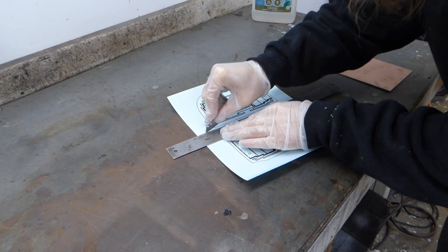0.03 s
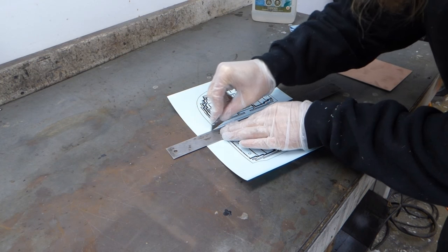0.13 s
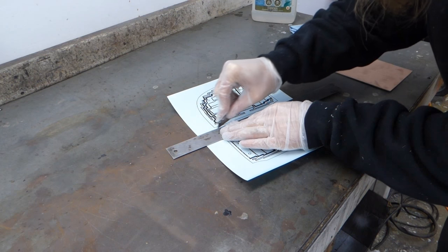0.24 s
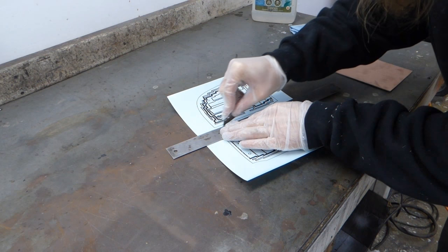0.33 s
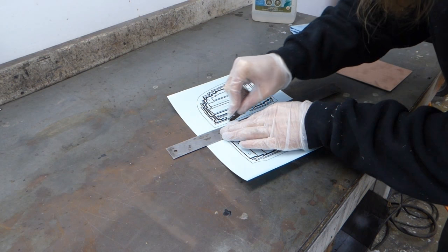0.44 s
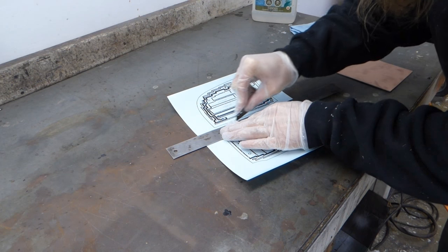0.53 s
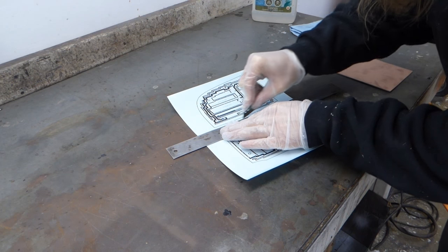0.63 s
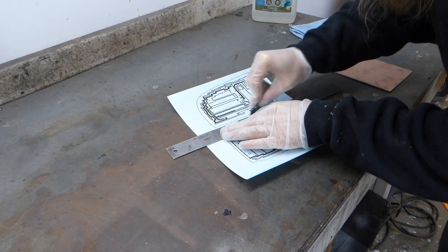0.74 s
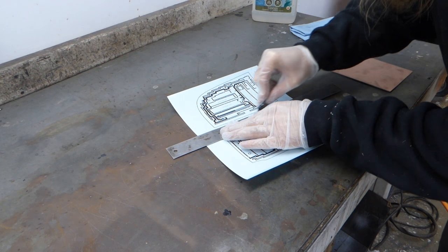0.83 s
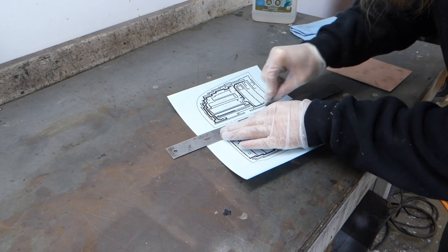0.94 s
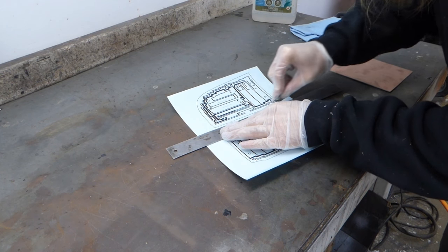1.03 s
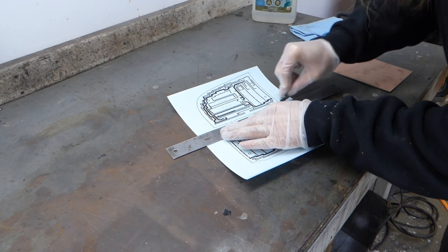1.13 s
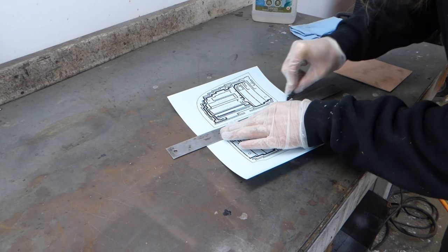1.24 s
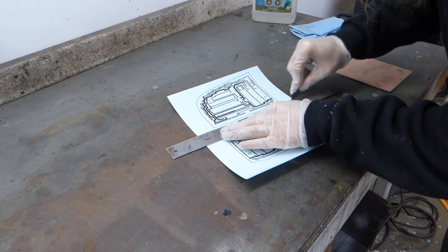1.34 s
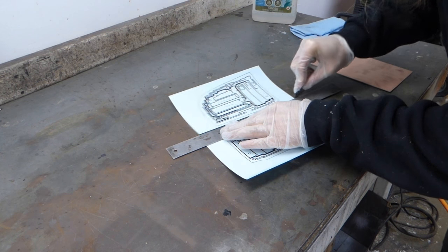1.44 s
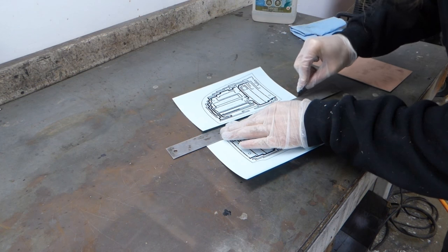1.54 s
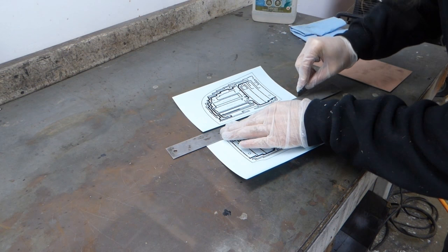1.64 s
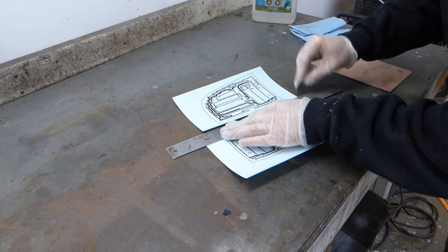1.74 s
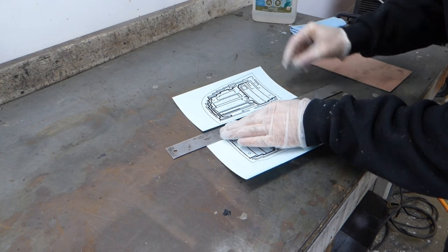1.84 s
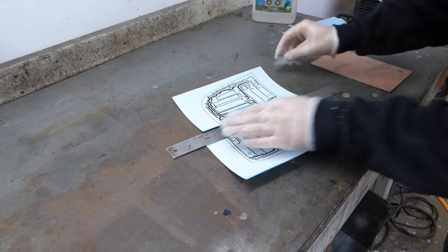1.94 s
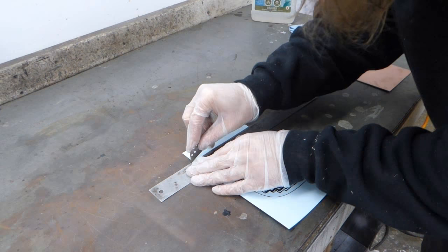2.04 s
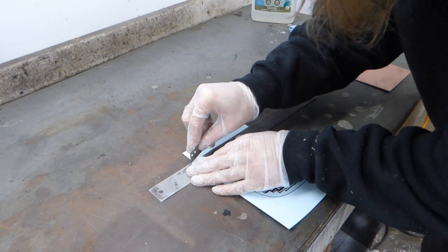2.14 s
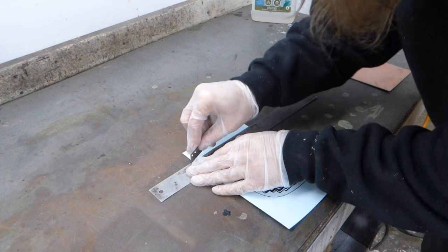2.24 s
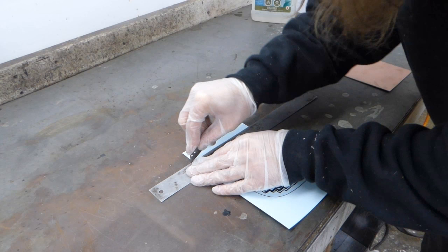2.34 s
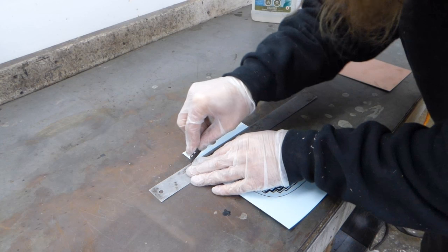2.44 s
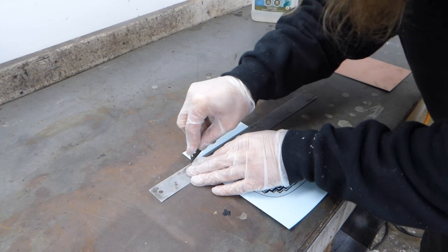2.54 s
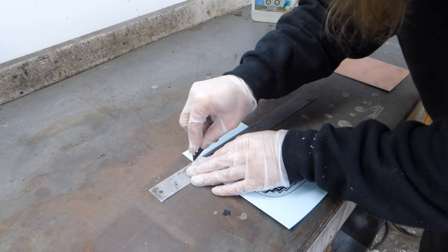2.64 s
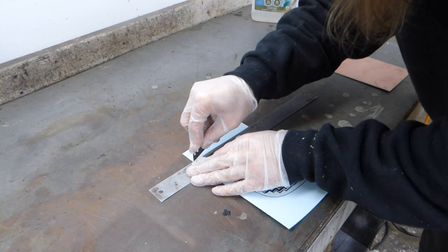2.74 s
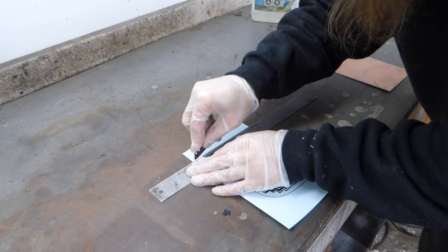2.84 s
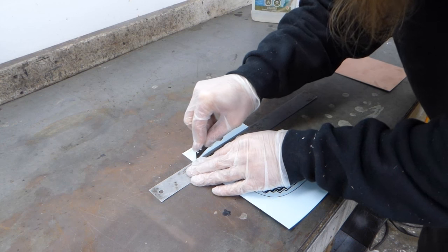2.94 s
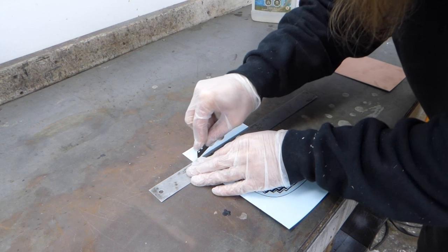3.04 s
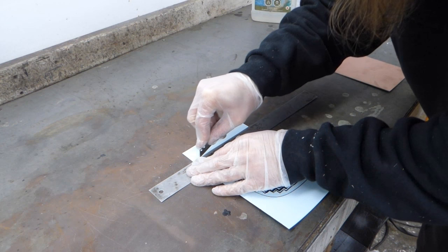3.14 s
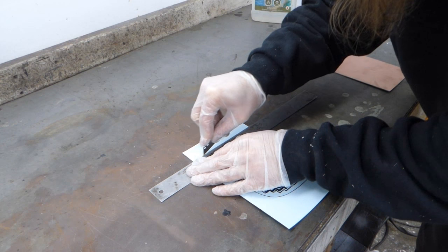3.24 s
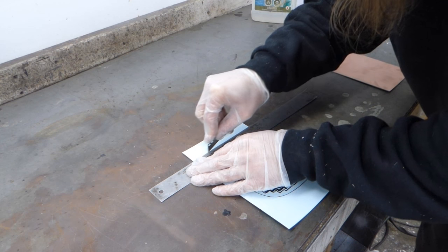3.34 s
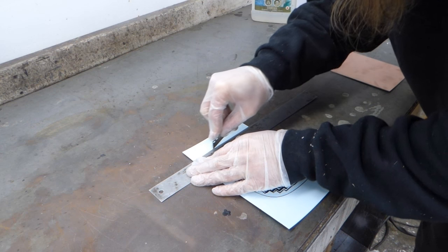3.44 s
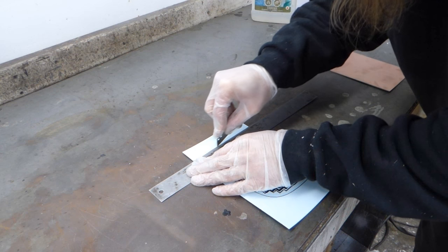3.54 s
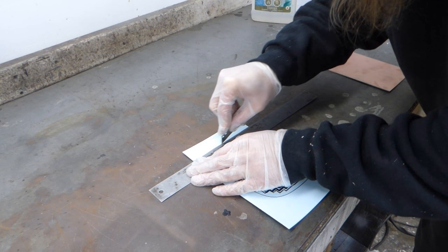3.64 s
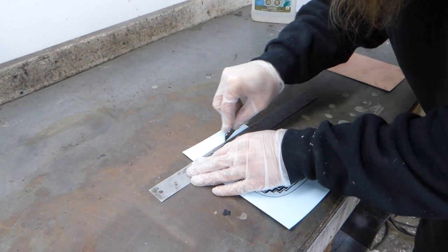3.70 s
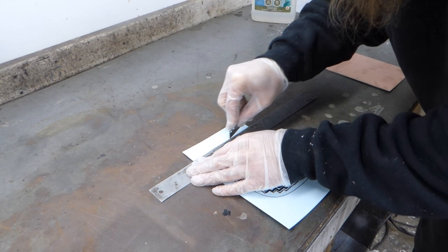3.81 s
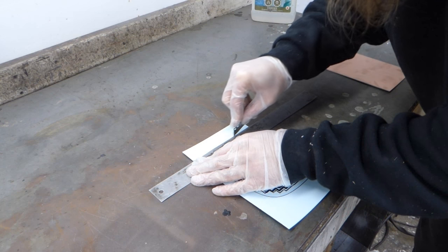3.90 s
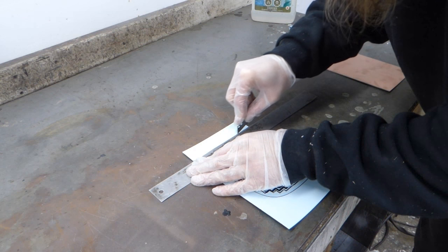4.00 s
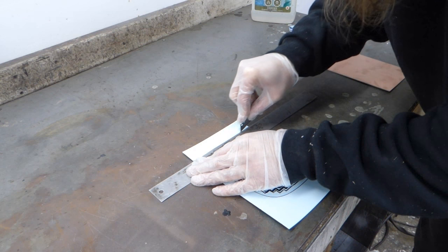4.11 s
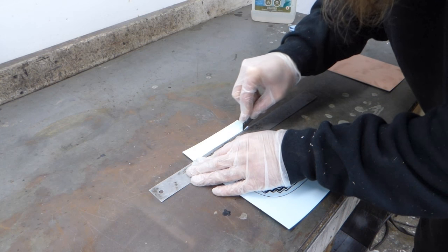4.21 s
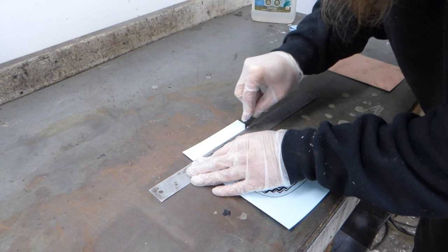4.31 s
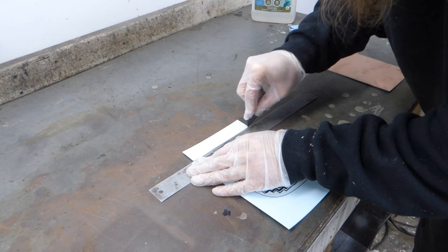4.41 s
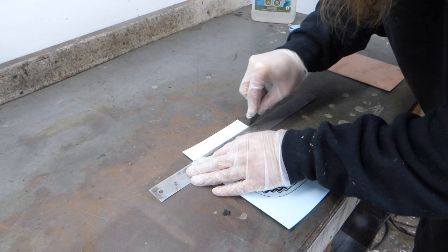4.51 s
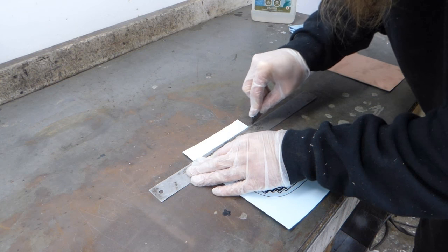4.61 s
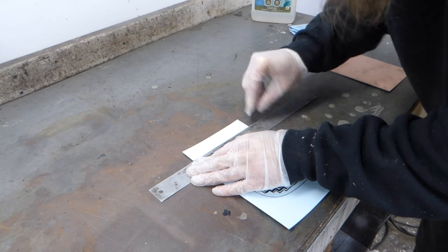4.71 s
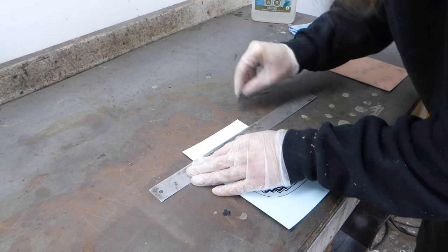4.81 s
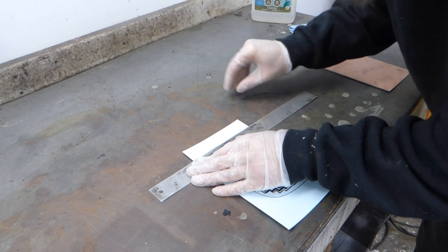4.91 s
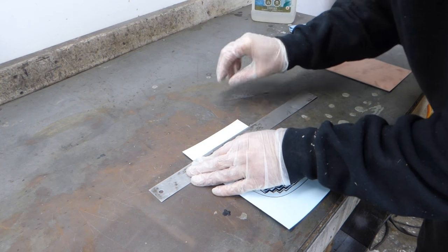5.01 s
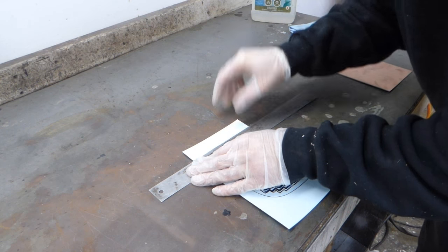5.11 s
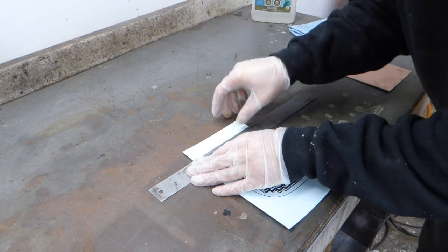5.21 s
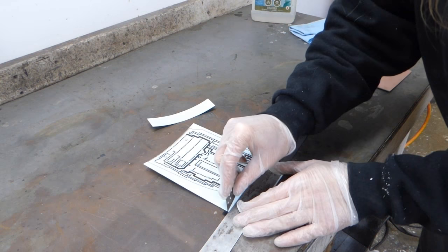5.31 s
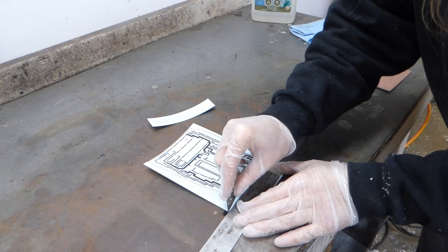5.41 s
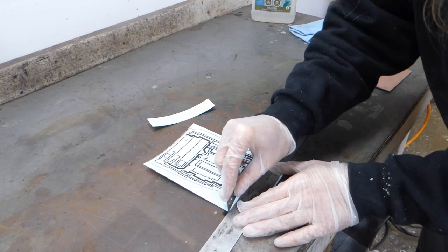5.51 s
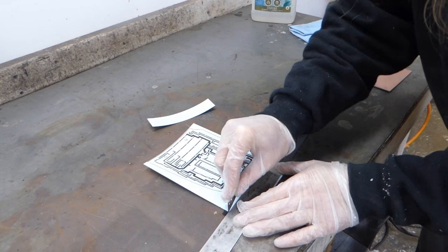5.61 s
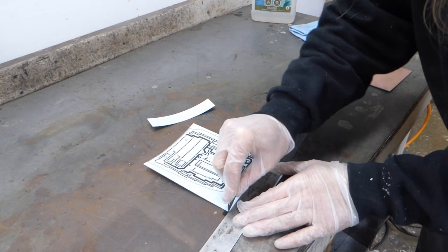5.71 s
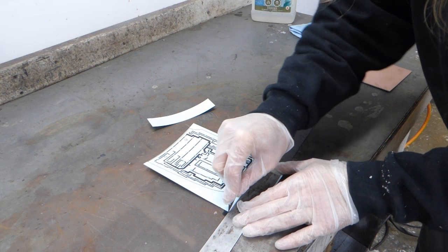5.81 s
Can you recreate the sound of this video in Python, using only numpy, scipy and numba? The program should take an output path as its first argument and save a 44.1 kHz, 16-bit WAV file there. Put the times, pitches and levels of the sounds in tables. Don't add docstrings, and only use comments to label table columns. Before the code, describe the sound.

Close, dry stereo sound in a small, moderately reverberant workshop with faint room tone and microphone hiss. From 0 to about 1.45 s a blade drags along a steel ruler through paper: uneven gritty scraping, low sheet-metal rumble, papery tearing and bright hiss, with a flap tone sinking in pitch and a tick at 0.6 s. A short rub follows at 1.5 s, then light ticks and scuffs around 1.75 and 1.95 s, and a cluster of clicks with a high steel squeal at 2.06 s. Small rubs occur at 2.4 to 2.9 s. The second cut begins softly at 3.0 s, strengthens from 3.4 s and lasts until 4.5 s, in two pushes. Brief scuffs follow at 4.5 to 4.8 s. At 4.92 s a very sharp, bright metal clack bounces rapidly and rings briefly. A low short rub comes at 5.2 s; the ambience cuts at 5.28 s, leaving quiet hiss and two barely audible ticks.

```python
import sys
import numpy as np
from scipy import signal
from scipy.fft import rfft, irfft, next_fast_len
from scipy.io import wavfile
from scipy.ndimage import uniform_filter1d
from numba import njit

SR = 44100
rng = np.random.default_rng(int(sys.argv[2]) if len(sys.argv) > 2 else 0)


def ratio_of_db(decibels):
    return 10 ** (np.asarray(decibels, float) / 20)


def file_out(sig):
    cols = np.atleast_2d(sig).T
    lim = np.clip(cols, -1, 1)
    pcm = np.round(lim * 32767).astype(np.int16)
    wavfile.write(sys.argv[1], SR, pcm)


N = 258205
T = np.arange(N) / SR
SCENE_CHANGE_S = 5.277


def unit(x):
    return x / np.sqrt(np.mean(x ** 2))


def on_log(hz, table, column=1):
    table = np.array(table, float)
    return np.interp(np.log(hz + 1), np.log(table[:, 0]), table[:, column])


def along(table, column):
    columns = np.transpose(table)
    return np.interp(T, columns[0], columns[column])


def colour(x, spectrum):
    size = 2048
    hz = np.arange(size // 2 + 1) * SR / size
    cepstrum = irfft(np.log(ratio_of_db(on_log(hz, spectrum))))
    cepstrum[1:size // 2] *= 2
    cepstrum[size // 2 + 1:] = 0
    response = irfft(np.exp(rfft(cepstrum)))
    return signal.fftconvolve(x, response)[:len(x)]


@njit
def moving_band(x, hz, width):
    y, band_state, low_state = np.empty(len(x)), 0., 0.
    for i in range(len(x)):
        g, k = np.tan(np.pi * hz[i] / SR), width / hz[i]
        v = (band_state + g * (x[i] - low_state)) / (1 + g * (g + k))
        band_state = 2 * v - band_state
        low_state += 2 * g * v
        y[i] = k * v
    return y


def band(x, hz, width):
    return moving_band(x, hz + np.zeros(len(x)), float(width))


def passband(x, low_hz, high_hz):
    return signal.sosfilt(signal.butter(3, [low_hz, high_hz], "band", fs=SR, output="sos"), x)


def body(x, modes):
    return unit(sum((-1) ** k * ratio_of_db(db) * band(x, hz, width) for k, (hz, width, db) in enumerate(modes)))


def walk(rate):
    hold = int(SR / rate)
    steps = np.repeat(rng.standard_normal(N // hold + 1), hold)
    return 1.1 * uniform_filter1d(uniform_filter1d(steps, hold), hold)[:N]


def swell(start, ms, skew):
    progress = np.clip((T - start) * 1000 / ms, 0, 1)
    return np.sqrt(np.sin(np.pi * progress ** skew).clip(0))


def pan(x, left_minus_right_db):
    return x * ratio_of_db(np.array([[left_minus_right_db], [-left_minus_right_db]]) / 2)


def grit(scatter_db, flicker_db, rate):
    size = np.minimum(rng.exponential(size=N), 4.5)
    return rng.standard_normal(N) * ratio_of_db(scatter_db * size + flicker_db * walk(rate))


# time_s, pressure_db on the bench, sliding_speed_db
CUTS = [
    [(0.0, -45, -55), (0.226, -38, -44), (0.394, -42, -49), (0.596, -36, -43), (0.646, -39, -46),
     (1.218, -39, -43), (1.432, -43, -50), (1.45, -46, -51)],
    [(3.0, -49, -68), (3.03, -48, -59), (3.06, -47, -62), (3.134, -41, -56), (3.14, -43, -49),
     (3.176, -40, -55), (3.434, -38, -45), (3.53, -37, -50)],
    [(3.545, -42, -50), (3.761, -37, -47), (3.907, -40, -49), (3.961, -36, -46), (4.179, -36, -52),
     (4.219, -41, -56), (4.293, -38, -53), (4.515, -46, -57)],
]
# start_s, hold_ms, pressure_db, speed_db, rise_db_per_ms
RUBS = [(1.465, 85, -42.5, -49, .9), (1.6, 40, -52.5, -64, .9), (4.0, 40, -34, -49, .4),
        (1.775, 40, -56, -60, .9), (1.9, 35, -58, -57, .1), (1.95, 30, -52, -56, .9),
        (2.51, 30, -62, -68, .4), (2.601, 108, -38.5, -57.5, 12), (2.74, 50, -53, -72, .9),
        (2.845, 35, -43, -59, .25), (2.892, 80, -43, -56, 3), (4.278, 12, -38, -51, 5),
        (4.525, 40, -37.5, -58, 1.5), (4.565, 50, -36, -57, .2), (4.68, 30, -48, -68, .9),
        (4.741, 30, -46, -56, 4), (4.8, 50, -58, -61, .2), (0.0, 20, -43, -55, .9),
        (5.198, 62, -41, -63, 12)]


def hand():
    controls = np.full((2, N), -120.)
    moves = [(cut, .9) for cut in CUTS]
    for s, ms, pressure_db, speed_db, rise in RUBS:
        moves.append(([(s, pressure_db, speed_db), (s + ms / 1000, pressure_db, speed_db)], rise))
    for move, rise in moves:
        s, *columns = np.transpose(move)
        early, late = (s[0] - T).clip(0), (T - s[-1]).clip(0)
        for k, fall_db_s in enumerate([200, 290]):
            level = np.interp(T, s, columns[k]) - 1000 * rise * early - fall_db_s * late
            controls[k] = np.maximum(controls[k], level)
    return controls


# time_s, bench_tilt_db_per_octave, rasp_db, deepest_modes_db
BITE = [(0.0, 0, 0, 0), (0.5, 0.1, -1, -1), (0.8, 0.5, 1, 0.1), (1.1, 0.6, 2, 0.5), (1.5, 0.6, 1, 1),
        (2.5, 0.1, 0.1, 0.1), (2.75, -1, 1, 2), (3.1, -1, 0.1, 3), (3.3, -0.5, 0.1, 2), (3.47, 2.5, 4, 2),
        (3.6, 1, 0.1, 2), (3.8, 1.5, 3, 0.1), (4.0, 0.1, 0.1, 1), (4.25, -2, 0.1, -1), (4.6, -1, 2, -3),
        (5.19, -2, 1, -2), (5.23, -6, 1, -5)]
# centre_hz, width_hz, level_db
RASP = [(1024, 370, -2), (1307, 90, 4), (1603, 355, -5)]
# pitch_hz, level_db_per_hz
PAPER = [(880, -13), (1500, -5), (1740, -10.5), (1970, 2), (2580, -1), (3350, 1.5), (5500, -6.5),
         (7150, -17), (12100, -120)]
# pitch_hz, level_db_per_hz
HISS = [(2650, -25.5), (4500, -7.5), (5140, -6), (6150, 3), (7060, 4.5), (8030, 0), (9550, 3), (13000, -14),
        (14600, -19.5), (15300, -24)]


def cutting():
    pressure_db, speed_db = hand()
    coarse, fine = grit(2.4, 1.4, rate=45), grit(2.5, 1.9, rate=35)
    loose, edge = grit(2.4, 1.5, rate=30), grit(2.2, 1.8, rate=20)
    rumble = unit(passband(passband(bench(coarse), 95, 1040), 60, 1100))
    rasp = unit(passband(body(coarse, RASP), 946, 2000))
    blade = unit(unit(colour(fine, HISS)) + 0.24 * singing_edge(edge))
    rasp_db = .65 * speed_db + .35 * pressure_db - 7.3 + along(BITE, 2)
    paper_db = .68 * speed_db + .32 * pressure_db - 7.2
    paper = unit(colour(fine, PAPER)) * ratio_of_db(paper_db) + paper_flap(loose, edge) * ratio_of_db(speed_db)
    low = pan(rumble, .2) * ratio_of_db(pressure_db - 0.6) + pan(rasp, 0.95) * ratio_of_db(rasp_db)
    return low + pan(paper, 1.49) + pan(blade, 2.4) * ratio_of_db(speed_db - 0.1)


# centre_hz, width_hz, level_db
BENCH = [(140.5, 33, -13.5), (172, 26, -4.5), (209.4, 13, -3), (255.7, 25.4, -2), (303.6, 22.4, 1),
         (366.3, 23, -4.5), (412, 14, 3.5), (489.4, 36, -4.5), (569, 20, -1.5), (620, 34, -6.5),
         (694, 34, -2.5), (790, 75, -8.5), (881, 55, -7), (985, 70, -9)]
# time_s, modes_near_280_hz_db, mode_near_690_hz_db
NODES = [(0.0, -5, -4), (0.2, -1, -3), (0.45, -3, 1), (0.6, -4, 2), (0.72, 2, -1), (0.85, 2, -5),
         (1.05, 5, -5), (1.5, -2, -4), (2.6, -4, -1), (3.0, -3, -3), (3.3, -3, -4), (3.6, 0.1, -1),
         (4.05, 1, 2), (4.25, 0.1, -4), (4.6, -1, -2), (5.2, 0.1, -3)]


def bench(slips):
    tilt, deep = along(BITE, 1), along(BITE, 3)
    pair, upper = along(NODES, 1), along(NODES, 2)
    out = 0
    for k, (hz, width, db) in enumerate(BENCH):
        place_db = tilt * np.log2(hz / 400) + deep * (hz < 230)
        place_db = place_db + pair * (230 < hz < 330) + upper * (650 < hz < 750)
        patchy_db = 1.4 * walk(6)
        out = out + (-1) ** k * ratio_of_db(db + patchy_db + place_db) * band(slips, hz, width)
    return unit(out)


# centre_hz, width_hz, level_db
RULER = [(1960, 60, -3), (2140, 60, -4), (2357, 50, 1.5), (2557, 50, -2), (2627, 45, 1.5), (2760, 60, -2),
         (3020, 50, -2), (3106, 40, -3), (3273, 50, 2), (3510, 55, 1.5), (3688, 45, -2), (3900, 50, -1),
         (4183, 50, -2), (4400, 60, -2)]


def paper_flap(loose, edge):
    low_hz = (2900 - 500 * T ** 1.3).clip(1500) * (1 + 0.016 * walk(25.15))
    high_hz = low_hz * 1.56
    lower = unit(moving_band(moving_band(loose, low_hz, 520.), low_hz, 520.))
    upper = unit(moving_band(moving_band(edge, high_hz, 1600.), high_hz, 1600.))
    lower_db = 4.8 - 12 * (1 - T / .72).clip(0) - 11 * (T - 1.03).clip(0)
    flap = lower * ratio_of_db(lower_db) + upper * ratio_of_db(2.2)
    flap = .88 * flap + .33 * np.std(flap) * body(flap, RULER)
    return flap * swell(0, 1560, .9) ** .7


# centre_hz, width_hz, level_db
BLADE = [(6530, 70, 0), (6900, 81, 8), (7170, 90, -2), (7960, 69, 1), (8390, 92, -1.5), (8980, 100, -3),
         (9540, 80, -11)]


def singing_edge(slips):
    out = 0
    for hz, width, db in BLADE:
        drifting_hz = hz * (1 + .008 * walk(4))
        out = out + ratio_of_db(db + 5.5 * walk(7)) * band(slips, drifting_hz, width)
    return unit(out)


# time_s, level_db
CLACK = [
    (4.9196, -24),
    (4.9207, -5),
    (4.9221, -5.5),
    (4.9234, -6),
    (4.9259, -14),
    (4.9272, -15),
    (4.958, -22),
]
# pitch_hz, level_db_per_hz
CRACK = [(40, -100), (120, -80), (400, -36), (900, -18), (1780, -18), (3000, -15), (4710, -6), (5930, 0.5),
         (7400, 3.5), (9570, 3), (10800, -3), (12700, -2.5), (13300, -33), (14200, -35), (15400, -68)]
# pitch_hz, level_db, t60_s
STEEL = [(2622, -42, .3), (5790, -33, .1), (7190, -38, .1)]
# start_s, length_ms, rms_db
RATTLE = (4.9205, 9, -21)
# pitch_hz, level_db, t60_s
RING = [(2622, -14, .5), (5033, -14, .3), (6223, 3, .4), (8419, -11, .3), (9808, -10, .25),
        (11690, -10, .3), (13590, -12, .12), (14380, -12, .25)]
# pitch_hz, level_db, start_s, length_ms
KNOCK = [(430, -40, 4.921, 12), (950, -29, 4.918, 12), (1540, -33, 4.921, 11), (2160, -30, 4.921, 9),
         (2770, -33, 4.92, 11), (3250, -30, 4.918, 10), (3960, -28, 4.92, 10), (4390, -28, 4.919, 10),
         (12400, -26, 4.921, 9), (10700, -27, 4.92, 9), (9390, -17, 4.92, 5), (7800, -20, 4.9215, 5)]


def clack():
    t = np.arange(SR // 2) / SR
    ring = sum(ratio_of_db(db) * np.sin(2 * np.pi * hz * t) * 1000 ** (-t / t60) for hz, db, t60 in STEEL)
    out = np.zeros((2, N + len(t)))
    for s, db in CLACK:
        push = np.zeros(len(t))
        push[:64] = rng.standard_normal(64) * np.exp(-t[:64] / 0.00023)
        crack = colour(push, CRACK)
        i = int(s * SR)
        out[:, i:i + len(t)] += pan((crack / np.abs(crack).max() + ring) * ratio_of_db(db), 5.5)
    start, ms, rattle_db = RATTLE
    chatter = unit(colour(rng.standard_normal(N), CRACK)) * swell(start, ms, 0.79) * ratio_of_db(rattle_db)
    since = (T - CLACK[3][0]).clip(0)
    sing = 0
    for hz, db, t60 in RING:
        level = ratio_of_db(db - 41 + 2 * walk(60))
        sing = sing + level * np.sin(2 * np.pi * hz * since) * 1000 ** (-since / t60)
    knock = sum(ratio_of_db(db) * swell(s, ms, .7) ** 2 * np.sin(2 * np.pi * hz * T) for hz, db, s, ms in KNOCK)
    return out[:, :N] + pan(knock, 5.1) + pan(chatter, 5.2) + pan(sing, .8)


# time_s, peak_db, centre_hz, thud_re_peak_db, left_minus_right_db
TICKS = [(0.5874, -25.5, 2800, -16, 1.5), (1.4586, -33, 3500, -21, -1), (1.5387, -51, 6470, -20.5, 0.1),
         (1.7579, -33, 2960, -26, -7), (2.0795, -31, 5500, -29, 1.5), (2.3745, -36, 6300, -24, 5),
         (2.5394, -54, 6460, -22, 0.1), (2.8907, -27, 3400, -18, 2.5), (3.0865, -49, 6000, -6, 0.6),
         (3.1403, -30, 6500, -20.5, 4), (4.0975, -36, 8500, -22, 3.5), (4.1278, -44, 900, 5, 0.5),
         (4.1695, -38.5, 3300, -21, 3), (4.2765, -33, 3380, -14, 1.5), (4.5209, -41, 10100, -21, 3),
         (5.1975, -43, 12500, -29, 3), (5.342, -50.5, 11000, -20.5, 0.1), (5.4664, -56, 2257, -18, -0.6),
         (2.0553, -31, 6200, -28, 3), (2.0742, -31, 6300, -28, 3), (2.0865, -38, 4400, -28, 2),
         (2.0985, -38, 6800, -28, 2), (2.664, -43, 8500, -28, 3), (2.678, -43, 6500, -28, 3),
         (2.918, -40, 7500, -28, 3), (4.7375, -38, 9500, -28, 3), (4.7485, -38, 7500, -28, 3),
         (5.252, -46, 8000, -28, 2), (1.9455, -38, 3000, -24, 2), (1.7615, -40, 8000, -28, 2)]
# pitch_hz, level_db_per_hz
TICK = [(500, -24), (900, -8), (2300, -4), (3500, -3), (5600, -6), (8000, -4), (10500, -9), (12500, -20),
        (15000, -30)]


def ticks():
    out, t = np.zeros((2, N)), np.arange(4096) / SR
    envelope = (1 - np.exp(-t / 0.00026)) * np.exp(-t / .0027)
    for s, db, hz, thud_db, pan_db in TICKS:
        push = rng.standard_normal(len(t)) * envelope
        tick = unit(band(colour(push, TICK), hz, 1.6 * hz)) + .8 * unit(band(push, hz, hz / 5))
        thud = ratio_of_db(thud_db) * 8 * body(push, BENCH) * np.std(tick)
        sound = (tick + thud) / np.abs(tick).max()
        i = int(s * SR)
        out[:, i:i + len(t)] += pan(sound * ratio_of_db(db), pan_db)
    return out


# start_s, length_ms, rms_db, centre_hz, thud_re_rms_db
SCUFFS = [(1.732, 49, -55, 3400, -5), (1.738, 32, -53, 8300, -25), (1.745, 40, -60, 14800, -30),
          (2.848, 16, -55, 7200, -25), (4.79, 75, -58, 9000, -25), (1.936, 30, -50, 2600, 0.1),
          (2.0545, 22, -44, 4800, -3), (2.071, 26, -46, 4600, -6), (4.519, 14, -55, 9500, -25),
          (2.09, 60, -61, 4600, -16), (4.954, 15, -32, 9000, -20.5), (4.735, 24, -49, 10500, -13),
          (5.228, 26, -53.5, 7500, -16), (5.266, 14, -55, 7500, -21), (2.376, 45, -61, 6300, -14),
          (2.372, 10, -48, 6500, -12), (2.39, 9, -56, 6300, -12), (1.456, 14, -48, 9000, -20),
          (1.455, 115, -60, 13000, -30), (1.9, 150, -64, 12000, -30), (1.943, 18, -57, 10000, -30),
          (1.975, 75, -60, 8500, -6), (1.98, 70, -61, 2600, -10), (2.056, 30, -50, 2200, -6),
          (2.085, 130, -61, 2300, -20), (4.55, 130, -59, 3000, -20), (4.734, 8, -53, 3100, -12),
          (2.89, 12, -47, 1800, -2), (4.276, 12, -50, 2500, -2), (2.805, 40, -63, 8000, -5)]


def scuffs():
    rub = grit(2.2, 1.5, rate=300)
    broad, thud = unit(colour(rub, TICK)), unit(passband(rub, 310, 1110))
    out = 0
    for start, ms, db, hz, thud_db in SCUFFS:
        sound = unit(band(broad, hz, 1.5 * hz)) + 0.41 * unit(band(rub, hz, hz / 4)) + ratio_of_db(thud_db) * thud
        out = out + pan(sound * swell(start, ms, .85) * ratio_of_db(db), 3.3)
    return out


# start_s, length_ms, pitch_hz, level_db
SQUEALS = [(2.0608, 13, 8387, -28), (2.0555, 8, 8387, -40), (2.055, 19, 11690, -46), (2.062, 14, 6100, -38),
           (2.058, 16, 13450, -52), (2.0548, 5, 6200, -36), (1.746, 9, 3080, -43), (1.757, 14, 3000, -39),
           (1.765, 90, 2980, -55), (1.737, 9, 3000, -50), (1.768, 30, 2750, -54), (4.926, 21, 6223, -29),
           (4.929, 18, 11750, -35), (4.945, 11, 8419, -32), (4.956, 20, 13590, -37), (4.963, 6, 6400, -32),
           (4.927, 8, 14000, -42), (1.748, 35, 640, -49), (4.735, 125, 270, -46), (3.405, 140, 1310, -51),
           (5.196, 84, 172, -47), (0.09, 200, 412, -46)]


def squeals():
    out = np.zeros(N)
    for start, ms, hz, db in SQUEALS:
        phase = 2 * np.pi * hz * np.cumsum(1 + .006 * walk(400)) / SR
        out += ratio_of_db(db + 2.5 * walk(300)) * swell(start, ms, 0.86) * np.sin(phase)
    return pan(out, .3)


# pitch_hz, level_db_per_hz
BLOW = [(71, -55), (120, -24), (184, -6.5), (338, -9.5), (717, -6), (826, -8.5), (953, -4.5), (3360, -9),
        (6430, -0.5), (9500, -3.5), (11800, -6.5), (13900, -8.5), (15400, -18)]


def clack_blast():
    blow = np.zeros(N)
    blow[int(CLACK[2][0] * SR)] = ratio_of_db(17.5)
    return colour(blow, BLOW)


# pitch_hz, left_right_correlation
LIKENESS = [(100, 0.82), (250, 0.97), (600, 0.85), (1000, 0.033), (3000, 0.091), (12000, 0.067)]


def diffuse(size):
    like = np.clip(on_log(np.arange(size // 2 + 1) * SR / size, LIKENESS), 0, 1)
    mid, side = rfft(rng.standard_normal((2, size)))
    mid, side = mid * np.sqrt((1 + like) / 2), side * np.sqrt((1 - like) / 2)
    return irfft(np.array([mid + side, mid - side]), size)


# pitch_hz, t60_s, level_db
ROOM = [(151, 0.53, -12), (400, 0.6, -16), (1000, 0.58, -11.5), (2475, 0.67, -13), (5000, 0.47, -14.5),
        (9000, 0.39, -12), (13000, 0.35, -11.5)]


def workshop(x):
    t, noise = np.arange(SR) / SR, diffuse(SR)
    rise = np.clip((t - .004) / 0.002, 0, 1)
    tail = 0
    for hz in 90 * 2 ** np.arange(0, 7.6, .5):
        fade = ratio_of_db(on_log(hz, ROOM, column=2)) * 1000 ** (-t / on_log(hz, ROOM)) * rise
        tail = tail + np.array([band(n, hz, hz / 3) for n in noise]) * fade
    return signal.fftconvolve(x.mean(axis=0)[None], tail * ratio_of_db(-23.5), axes=1)[:, :N]


# pitch_hz, level_db_per_hz
AIR = [(15, -63), (25, -27.5), (266, -13.5), (305, -8.5), (399, -21.5), (481, -14.5), (1140, -18.5),
       (1450, -20), (2620, -24), (4990, -25), (11500, -29.5), (13900, -34), (15400, -26.5)]


def air():
    noise = diffuse(2 * next_fast_len(N // 2 + 1))[:, :N]
    tone = np.array([colour(n, AIR) for n in noise])
    return unit(tone) * ratio_of_db(-58.5 + 0.74 * walk(2.52))


def scene():
    rub, small, ringing = cutting(), ticks() + scuffs(), squeals()
    into_room = small * (T < SCENE_CHANGE_S) + ringing / 10 + clack_blast() + rub * ratio_of_db(-4)
    before_change = np.clip((SCENE_CHANGE_S - T) / .003, 0, 1)
    return small + ringing + (clack() + rub + workshop(into_room)) * before_change + air()


def low_pass(x):
    return signal.sosfilt(signal.butter(12, 15590, fs=SR, output="sos"), x)


def record(dry):
    trimmed = signal.sosfilt(signal.butter(2, 50, "high", fs=SR, output="sos"), dry)
    trimmed = signal.sosfilt(signal.ellip(8, .2, 70, 15350, fs=SR, output="sos"), trimmed)
    return low_pass(trimmed)


dry = scene()
out = record(dry)
file_out(out)
```